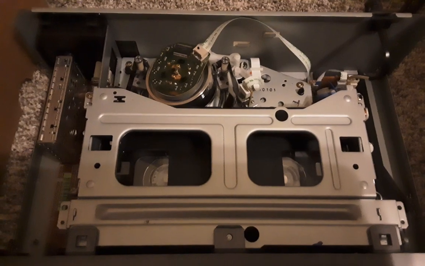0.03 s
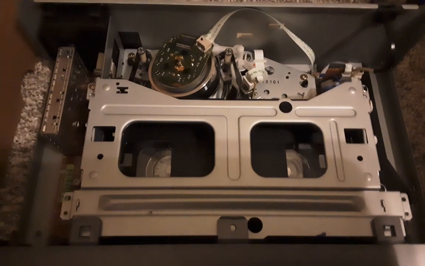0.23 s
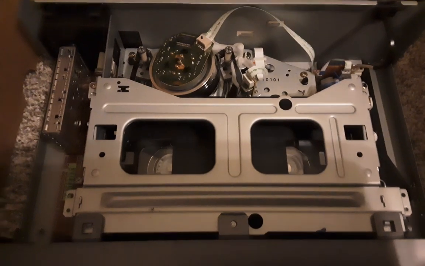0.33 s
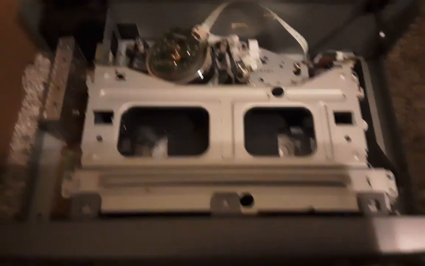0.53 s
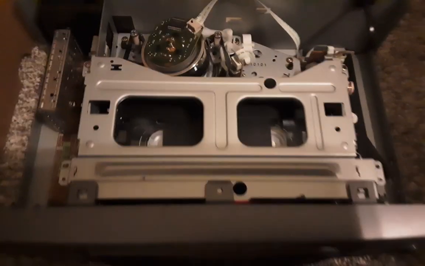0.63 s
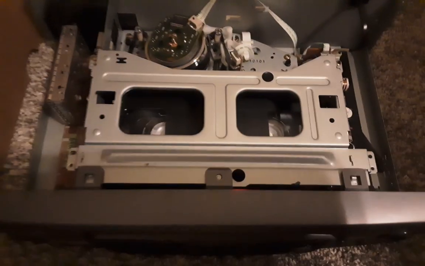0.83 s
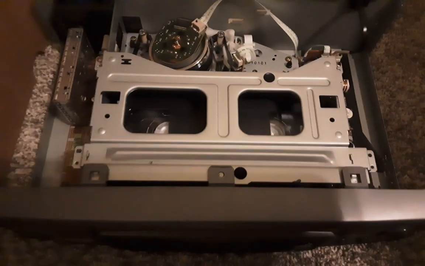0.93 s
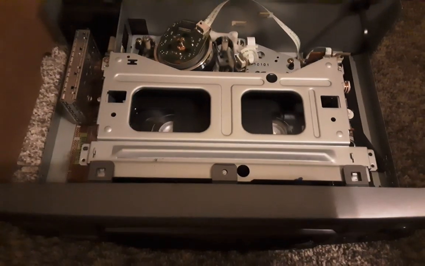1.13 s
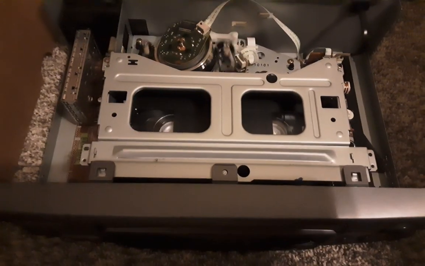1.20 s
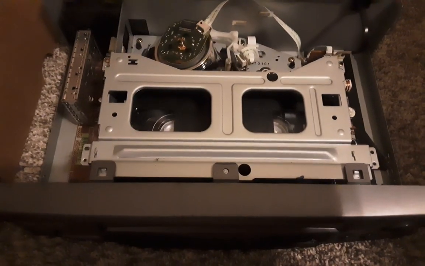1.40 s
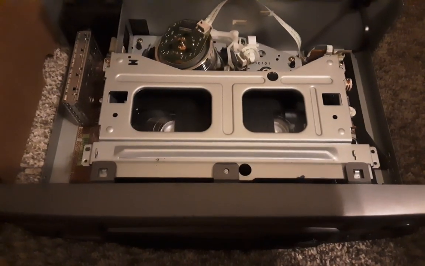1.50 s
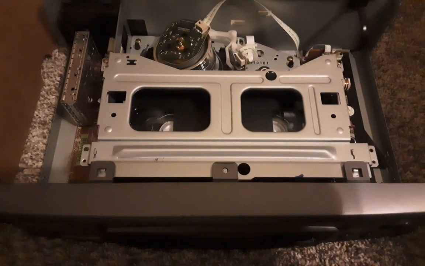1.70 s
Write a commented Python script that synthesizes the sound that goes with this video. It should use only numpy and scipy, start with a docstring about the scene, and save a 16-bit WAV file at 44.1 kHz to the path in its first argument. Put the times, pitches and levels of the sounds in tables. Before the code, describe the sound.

Close up indoors, a video recorder mechanism hums and whirs until a latch clicks hard. The carriage sinks with soft bumps, the cassette knocks into place, and levers clatter against steel over whirring gears and faint rapid ticking.

```python
"""An open video recorder loads a cassette, heard from close by in a carpeted room.
At first a small motor hums, its gears whir and the head drum whines; at 0.2 s a latch snaps shut.
Near 0.5 s the carriage sinks with dull bumps, and soon the spinning heads tick against the tape.
From 0.8 s the motor runs again to thread the tape, and at 1 s the hollow cassette knocks into its seat.
To the end, guide levers strike the steel chassis and set its modes ringing."""
import sys
import numpy as np
from scipy import signal
from scipy.fft import rfft, irfft, next_fast_len
from scipy.io import wavfile
from scipy.ndimage import map_coordinates

SR = 44100
rng = np.random.default_rng(int(sys.argv[2]) if len(sys.argv) > 2 else 0)


def to_wav(sig):
    """Store sig (one row per channel, or 1-D mono) as 16-bit WAV at the path in sys.argv[1].

    Samples outside -1..1 are clipped; the rate is SR.
    """
    pcm = np.clip(np.atleast_2d(sig), -1, 1) * 32767
    pcm = np.round(pcm).astype(np.int16)
    wavfile.write(sys.argv[1], SR, pcm.T)  # frames by channels


N = 77175


def amp(db):
    return 10 ** (np.asarray(db) / 20)


def unit(x):
    return x / np.sqrt(np.mean(x ** 2) + 1e-20)


def curve(rows):
    """Linear interpolation of (time, value) points, one value per sample."""
    return np.interp(np.arange(N) / SR, *np.transpose(rows))


def wobble(rate):
    """Smooth random modulation: a spline through `rate` knots a second."""
    return map_coordinates(rng.standard_normal(400), [np.arange(N) * rate / SR], mode="wrap")


def noise(spectrum, size=N):
    """Random-phase synthesis: noise of rms 1 with the given spectral envelope."""
    hz, db = np.transpose(spectrum)
    f = np.fft.rfftfreq(size, 1 / SR)
    gain = amp(np.interp(np.log(f + 1), np.log(hz), db))
    return unit(irfft(gain * np.exp(2j * np.pi * rng.random(len(f))), size))


def tone(hz, waver):
    """Frequency modulation: a sine of rms 1 whose pitch wanders by the fraction `waver`."""
    return np.sqrt(2) * np.sin(2 * np.pi * np.cumsum(hz * (1 + waver * wobble(30.25))) / SR)


def add(track, start, sound):
    """Superpose a sound on the track from `start` seconds."""
    part = track[max(0, round(start * SR)):][:len(sound)]
    part += sound[:len(part)]


# envelope of the friction noise (time [s], level [dB])
HISS_ENVELOPE = [(0, -60), (.2, -58.5), (.34, -66.5), (.46, -70), (.56, -60.5), (.64, -60), (.95, -58.5),
                 (1.2, -55.5), (1.75, -57)]
# spectra of the friction noise and the room (frequency [Hz], gain [dB])
HISS_SPECTRUM = [(1500, -33), (3200, 1), (4800, 2.5), (5700, 4), (6400, -2), (7200, 3.5), (9000, -5),
                 (11000, 3), (12200, -3), (16000, -13)]
ROOM_SPECTRUM = [(25, -27), (55, -13), (400, -10.5), (700, 6.5), (2500, -39), (9300, -11), (10900, 1.5),
                 (12000, -23), (16000, -69)]

def hiss():
    """Friction noise: sliding parts and tape hiss over the quiet room."""
    friction = amp(curve(HISS_ENVELOPE) + 0.88 * wobble(150)) * noise(HISS_SPECTRUM)
    return friction + amp(-64.5) * noise(ROOM_SPECTRUM)


# effort of the gear train (time [s], level [dB])
GEAR_ENVELOPE = [(0, -48), (.2, -48), (.315, -42), (.34, -63), (.45, -57), (.49, -42.5), (.57, -48),
                 (.64, -57.5), (.8, -56.5), (.9, -51), (1.0, -49), (1.2, -44), (1.38, -45), (1.54, -44.5),
                 (1.58, -49), (1.75, -48.5)]
# spectrum of the whir (frequency [Hz], gain [dB])
GEAR_SPECTRUM = [(100, -26.5), (230, -5), (420, -19), (570, -4), (650, 1.5), (725, 4), (800, -6.5),
                 (930, -16), (1190, 2), (1310, -8.5), (1500, 0), (1750, -5), (2100, -13), (2600, -18.5),
                 (3150, -11.5), (3900, -24.5), (7000, -39), (15000, -35)]
# partials of the motor's first run (frequency [Hz], level [dB])
MOTOR_PARTIALS = [(280, -57.5), (688, -50.5), (1061, -61.5), (1174, -52.5)]
# partials while it threads the tape (frequency [Hz], level re the whir [dB])
THREAD_PARTIALS = [(690, -6.5), (1172, -13)]

def gears(mesh_hz=103, stop_s=0.227, restart_s=0.826, fade_s=0.03):
    """Amplitude modulation: meshing teeth chop a whir; the motor hums, stops, then whines anew."""
    t = np.arange(N) / SR
    teeth = 1 + 0.29 * tone(mesh_hz, waver=0.014) / np.sqrt(2)
    whir = unit(noise(GEAR_SPECTRUM) * teeth * amp(0.26 * wobble(70)))
    running = np.clip((stop_s - t) / fade_s, 0, 1)
    hum = running * sum(amp(db) * tone(hz, waver=0.0096) for hz, db in MOTOR_PARTIALS)
    threading = np.clip((t - restart_s) / fade_s, 0, 1)
    whine = sum(amp(db + 2.5 * wobble(mesh_hz)) * tone(hz, waver=0.01216) for hz, db in THREAD_PARTIALS)
    return hum + (whir + threading * whine) * amp(curve(GEAR_ENVELOPE))


# envelope of the drum's whine (time [s], level [dB])
DRUM_ENVELOPE = [(0, -39), (.3, -41), (.8, -46), (1.0, -49), (1.15, -45), (1.35, -78), (1.75, -47)]
# spectrum of its rushing noise (frequency [Hz], gain [dB])
DRUM_SPECTRUM = [(500, -53), (1000, -3), (1300, 3), (1550, 6), (1700, 5), (1880, 15.5), (2010, 8),
                 (2100, -9), (2700, -22), (3100, -5), (4000, -26), (12000, -30)]
# its two partials, a column each (frequency [Hz], level re the envelope [dB])
DRUM_HZ = (1480, 1905)
DRUM_DB = (-13, -11.5)
# faint steady high whistles (frequency [Hz], level [dB])
HIGH_WHISTLES = [(4317, -74), (5523, -73.5), (11025, -77)]
HEAD_PASS_HZ, HEAD_START_S = 59.95, 0.6398

def drum(whistle_start_s=0.53):
    """Rotational modulation: the drum motor's whine pulses as the heads pass; faint whistles join it."""
    t = np.arange(N) / SR
    passing = 1 + 0.18 * np.cos(2 * np.pi * HEAD_PASS_HZ * (t - HEAD_START_S))
    partials = sum(amp(db + 2.4 * wobble(22.24)) * tone(hz, waver=0.0029)
                   for hz, db in zip(DRUM_HZ, DRUM_DB))
    whine = amp(curve(DRUM_ENVELOPE)) * passing * (partials + amp(-9) * noise(DRUM_SPECTRUM))
    whistle = sum(amp(db + 3.8 * wobble(40.2)) * tone(hz, waver=0.00208) for hz, db in HIGH_WHISTLES)
    return whine + whistle * np.clip((t - whistle_start_s) / 0.046, 0, 1)


# envelope of the ticking (time [s], level [dB])
TICK_ENVELOPE = [(.62, -39.5), (.74, -38), (.95, -41.5), (1.2, -37), (1.75, -53)]
# modes of one tick (frequency [Hz], relative level [dB])
TICK_MODES = [(1860, 3.5), (1950, -5), (3050, -8.5), (3350, -5.5), (5700, -11), (7200, -14)]

def heads(t60_s=0.019, attack_s=0.002, scatter_db=1.5):
    """Periodic impact: each passing head, two to a turn of the drum, ticks against the tape."""
    out, t = np.zeros(N), np.arange(SR // 25) / SR
    ring = sum(amp(db) * np.sin(2 * np.pi * hz * t) for hz, db in TICK_MODES)
    scrape = 0.1 * noise(HISS_SPECTRUM, size=len(t))
    tick = (ring + scrape) * amp(-60 * t / t60_s) * (1 - np.exp(-t / attack_s))
    for k in range(int((N / SR - HEAD_START_S) * HEAD_PASS_HZ)):
        add(out, HEAD_START_S + k / HEAD_PASS_HZ, tick * amp(scatter_db * rng.normal()))
    return out * amp(curve(TICK_ENVELOPE))


# envelope of the low rumble (time [s], level [dB])
RUMBLE_ENVELOPE = [(0, -63), (.33, -62), (.43, -76), (.52, -50.5), (.7, -61), (1.0, -67.5), (1.42, -56.5),
                   (1.75, -75)]
# its spectrum (frequency [Hz], gain [dB])
RUMBLE_SPECTRUM = [(25, -12), (55, 2), (170, -5), (400, -7.5), (1000, -66), (4000, -80)]
# dull impacts (time [s], level [dB], frequency [Hz])
BUMPS = [(0.481, -45, 184), (0.5, -36, 395), (0.607, -44.5, 142), (1.226, -43, 161), (1.24, -39, 332),
         (1.252, -41, 165), (1.275, -51, 65), (1.415, -47.5, 171)]

def bumps(t60_cycles=12.5, attack_s=0.0018):
    """Constant-Q damping: bumps of carriage and casing die within a few cycles, over a low rumble."""
    out, t = np.zeros(N), np.arange(SR // 3) / SR
    for start, db, hz in BUMPS:
        thud = noise([(hz / 4, -30), (hz, 0), (hz * 3, -16), (hz * 20, -90)], size=len(t))
        body = np.sin(2 * np.pi * hz * t) + 0.5 * thud
        add(out, start, amp(db - 60 * t * hz / t60_cycles) * (1 - np.exp(-t / attack_s)) * body)
    return out + amp(curve(RUMBLE_ENVELOPE)) * noise(RUMBLE_SPECTRUM)


def carriage(start_s=0.514, from_hz=520, to_hz=50, glide_s=0.017, attack_s=0.016, t60_s=0.22):
    """Damped glide: the sinking carriage falls from a hollow note to a thud."""
    t = np.maximum(np.arange(N) / SR - start_s, 0)
    hz = to_hz + (from_hz - to_hz) * np.exp(-t / glide_s)
    phase = 2 * np.pi * np.cumsum(hz * (t > 0)) / SR
    body = np.sin(phase) + 0.5 * wobble(103) * np.sin(2 * phase)
    return amp(-37 - 60 * t / t60_s) * (1 - np.exp(-t / attack_s)) * body


# modes of the cassette shell (frequency [Hz], level [dB])
SHELL_MODES = [(585, -37), (657, -30), (765, -33), (870, -38), (950, -35)]

def cassette(seat_s=1.016, t60_s=0.068, attack_s=0.0012):
    """Shell resonance: the hollow plastic cassette gives one woody knock as it seats."""
    t = np.maximum(np.arange(N) / SR - seat_s, 0)
    ring = sum(amp(db) * np.sin(2 * np.pi * (hz * t + rng.random())) for hz, db in SHELL_MODES)
    return ring * amp(-60 * t / t60_s) * (1 - np.exp(-t / attack_s))


# notes of small springs and pins (time [s], level [dB], frequency [Hz])
PINGS = [(0.431, -46, 6000), (0.499, -30, 3070), (.5567, -33, 5770), (1.017, -33.5, 3130),
         (1.085, -26.5, 1530), (1.604, -29.5, 1473)]

def pings(t60_s=0.04, attack_s=0.0012):
    """Free vibration: flicked springs and pins ring briefly and a little roughly."""
    out, t = np.zeros(N), np.arange(SR // 8) / SR
    for start, db, hz in PINGS:
        ring = np.sin(2 * np.pi * hz * t + 0.75 * wobble(hz / 10)[:len(t)])
        add(out, start, amp(db - 60 * t / t60_s) * (1 - np.exp(-t / attack_s)) * ring)
    return out


def casing(x, echoes=12, spread_s=0.008, echo_db=-5, above_hz=2140):
    """Comb filtering: short reflections between the steel walls colour the treble."""
    walls = np.zeros(SR // 10)
    delays = (spread_s * SR * rng.random(echoes) ** 2).astype(int) + 20
    walls[delays] = rng.choice([-1, 1], echoes) / np.sqrt(echoes)
    treble = signal.sosfilt(signal.butter(4, above_hz, "high", fs=SR, output="sos"), x)
    return x + amp(echo_db) * signal.fftconvolve(treble, walls)[:N]


# dense plate resonances in a low, middle and high band (frequency [Hz], gain [dB])
KNOCK_SPECTRUM = [(30, -48), (80, -21), (480, -19.5), (590, -4.5), (690, 4), (790, -10), (950, -7.5),
                  (1300, -5.5), (3000, -68)]
RING_SPECTRUM = [(700, -60), (1000, -20), (1450, 8.5), (1800, 0), (2300, -3.5), (2750, -8.5), (6000, -52)]
SNAP_SPECTRUM = [(1400, -6.5), (2500, 0.5), (3200, 9), (3900, -1), (5200, 1), (6300, -0.5), (7400, 3.5),
                 (9200, -7), (10900, -2), (16000, -45)]
# crack of a hard contact (frequency [Hz], gain [dB])
CRACK_SPECTRUM = [(6000, -30), (11000, 8), (14000, 9), (16000, -9)]
HARD_DB, CRACK_T60_S, KNOCK_RISE_S = -32, 0.0099, 0.0012
ROOM_DB, ROOM_T60_S = -19.5, 0.21

def strike(levels, modes, modes_db, dense_db, t60s, attack_s, spread):
    """Impact excitation: clear modes, dense plate resonances, a crack and a faint room tail."""
    t = np.arange(SR // 4) / SR
    bands = np.zeros((3, len(t)))  # knock, ring, snap, as in levels, dense_db and t60s
    for hz, db, t60 in modes:
        band = int(hz > 1000) + int(hz > 2600)
        detuned_hz = hz * (1 + spread * rng.normal())
        phase = 2 * np.pi * (detuned_hz * t + rng.random())
        bands[band] += amp(levels[band] + modes_db + db + rng.normal() - 60 * t / t60) * np.sin(phase)
    for band, spectrum in enumerate((KNOCK_SPECTRUM, RING_SPECTRUM, SNAP_SPECTRUM)):
        fade = np.hypot(amp(-60 * t / t60s[band]), amp(ROOM_DB - 60 * t / ROOM_T60_S))
        bands[band] += amp(levels[band] + dense_db[band]) * fade * noise(spectrum, size=len(t))
    knock, ring, snap = bands
    crack_db = levels[-1] - 1.5 + min(0, levels[-1] - HARD_DB)  # soft contacts lose their crack
    crack = amp(crack_db - 60 * t / CRACK_T60_S) * noise(CRACK_SPECTRUM, size=len(t))
    slow_rise = 1 - np.exp(-(t / KNOCK_RISE_S) ** 2)  # the low resonance builds up last
    return knock * slow_rise + (ring + snap + crack) * (1 - np.exp(-t / attack_s))


# lever and guide contacts (time [s], ring level [dB], knock level [dB], snap level [dB])
LEVER_CONTACTS = [(0.4324, -36.5, -55, -48), (0.4783, -38.5, -44, -53), (0.4994, -31, -39, -42.5),
                  (0.5560, -33, -36, -35.5), (0.6144, -55, -47.5, -46.5), (1.0161, -29.5, -31.5, -41),
                  (1.0824, -25.5, -36.5, -31), (1.1343, -32.5, -70, -30.5), (1.1424, -47, -48, -36.5),
                  (1.1533, -27, -33.5, -31.5), (1.1972, -31, -37.5, -35.5), (1.2144, -38, -50, -39),
                  (1.2925, -26, -39.5, -25.5), (1.3044, -25.5, -37, -31), (1.3123, -34, -47, -36.5),
                  (1.3234, -40, -41, -33), (1.3384, -38.5, -33, -50), (1.4314, -32, -57, -38.5),
                  (1.4504, -39, -69, -30.5), (1.4764, -33, -39.5, -34.5), (1.6053, -39.5, -60, -41.5),
                  (1.6224, -66, -60, -35.5), (1.6666, -33, -40, -40.5)]
# modes of the steel chassis (frequency [Hz], relative level [dB], T60 [s])
CHASSIS_MODES = [(681.7, 0, 0.14), (1222, -13, 0.18), (1554, -17, 0.11), (1713, -6.5, 0.14),
                 (3143, -8.5, 0.14), (4670, -11.5, 0.073), (7700, -15, 0.023)]

def levers():
    """Plate vibration: levers and tape guides strike the chassis and excite its modes."""
    out = np.zeros(N)
    for start, ring, knock, snap in LEVER_CONTACTS:
        clack = strike((knock, ring, snap), CHASSIS_MODES, modes_db=-3.5, dense_db=(0, -1, 3),
                       t60s=(0.055, 0.045, 0.033), attack_s=0.001, spread=0.028)
        add(out, start, clack)
    return out


# latch contacts (time [s], knock level [dB], ring level [dB], snap level [dB])
LATCH_CONTACTS = [(.2104, -29, -26, -39), (.2128, -15.5, -15, -19.5), (.2165, -31, -22, -26),
                  (.2305, -27, -25, -35)]
# modes of the latch, a column each (frequency [Hz], relative level [dB], T60 [s])
LATCH_HZ = (687, 1220, 1252, 1470, 1632, 2560, 3308, 4680, 7420, 10800)
LATCH_DB = (0.5, -0.5, 2.5, 0.5, -10, -14, -1.5, -14, -5.5, -18)
LATCH_T60_S = (.07, .075, .065, .07, .08, .045, .06, .05, .055, .03)

def latch():
    """Contact bounce: the latch touches, snaps home and rebounds, ringing each time."""
    out = np.zeros(N)
    for start, *levels in LATCH_CONTACTS:
        click = strike(levels, zip(LATCH_HZ, LATCH_DB, LATCH_T60_S), modes_db=-2.5,
                       dense_db=(-8, -7, -0.5), t60s=(0.04, 0.045, 0.028), attack_s=0.00044, spread=0.003)
        add(out, start, click)
    return out


def scene():
    """Superposition in mono; hiss, gears and levers sound from deep in the casing."""
    enclosed = casing(hiss() + gears() + levers())
    return (enclosed + drum() + heads() + bumps() + carriage() + cassette() + pings() + latch())[None]


def record(dry, low_hz=42, top_hz=16400):
    """Band limiting: the deepest bass rolls off and nothing passes above the top frequency."""
    size = next_fast_len(N + SR // 2)
    hz = np.fft.rfftfreq(size, 1 / SR)
    low_cut = hz ** 4 / np.hypot(hz ** 4, low_hz ** 4)
    return irfft(rfft(dry, size) * low_cut * (hz < top_hz), size)[..., :N]


dry = scene()
out = record(dry)
to_wav(out)
```